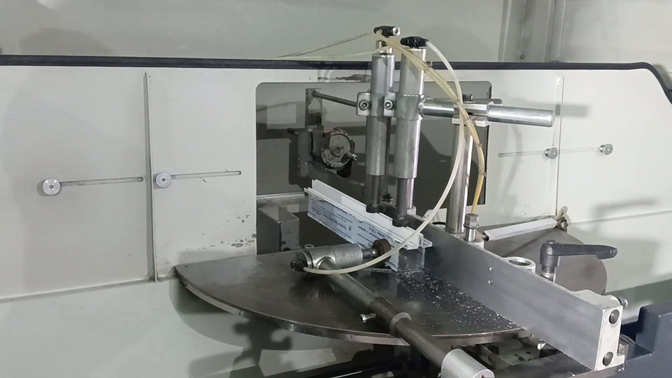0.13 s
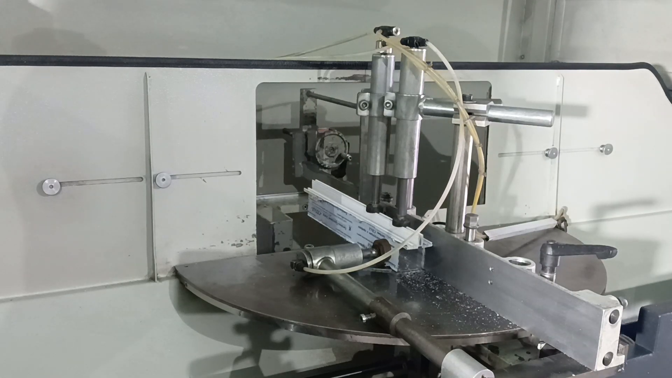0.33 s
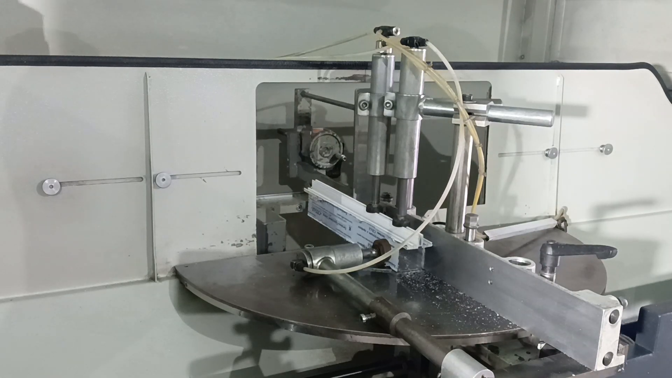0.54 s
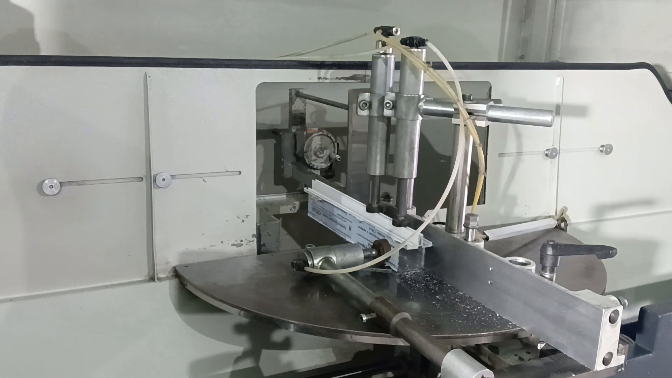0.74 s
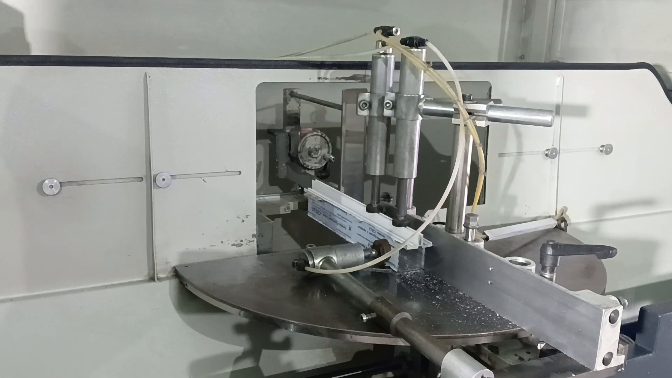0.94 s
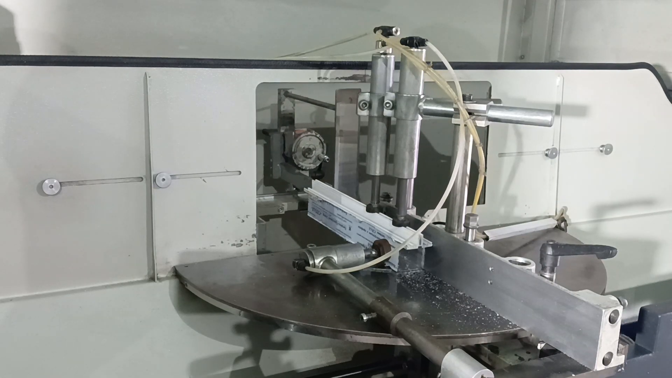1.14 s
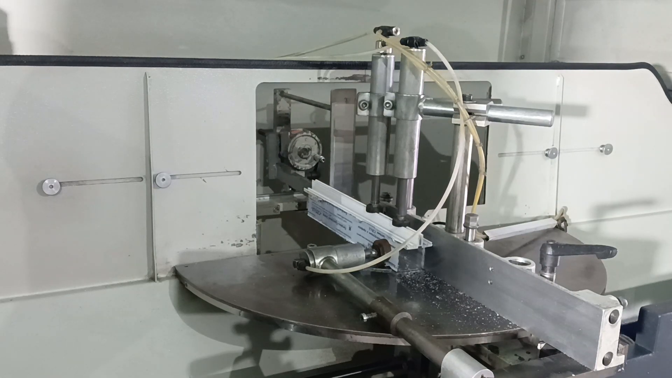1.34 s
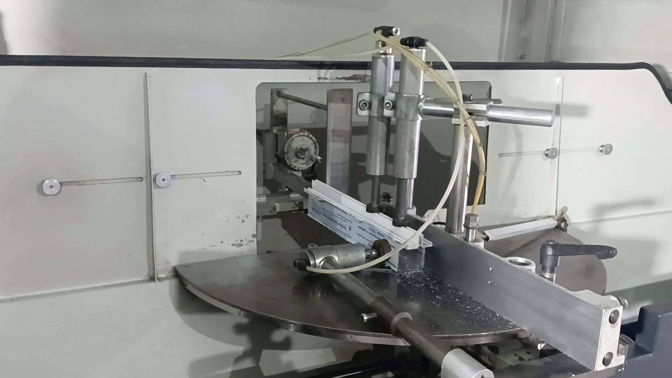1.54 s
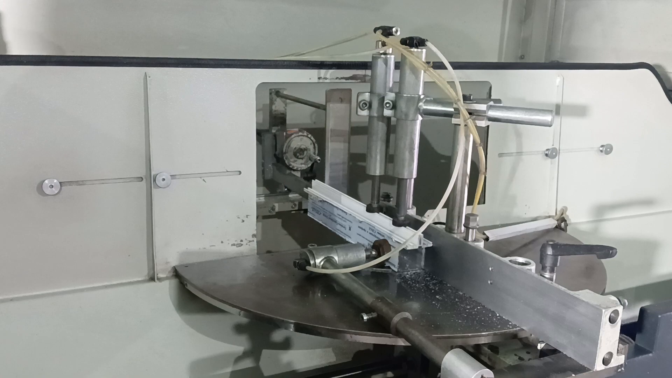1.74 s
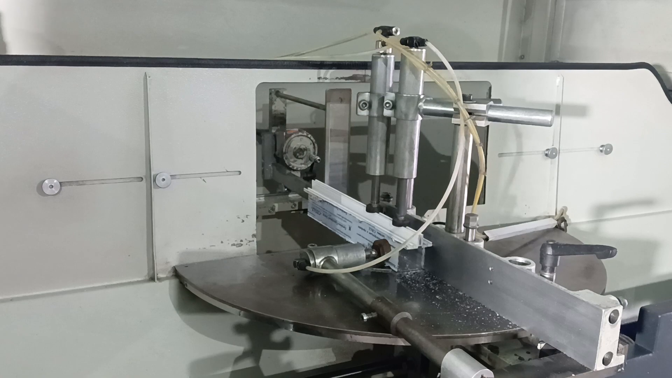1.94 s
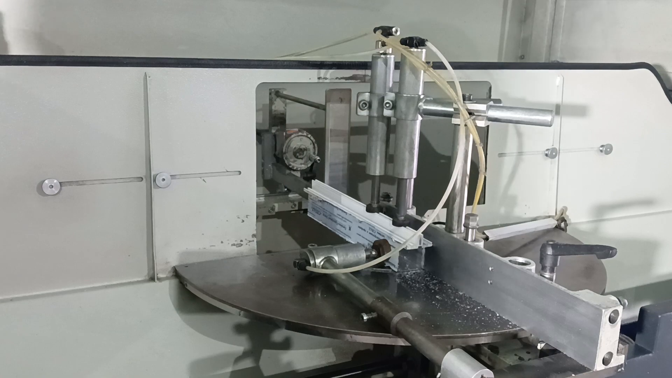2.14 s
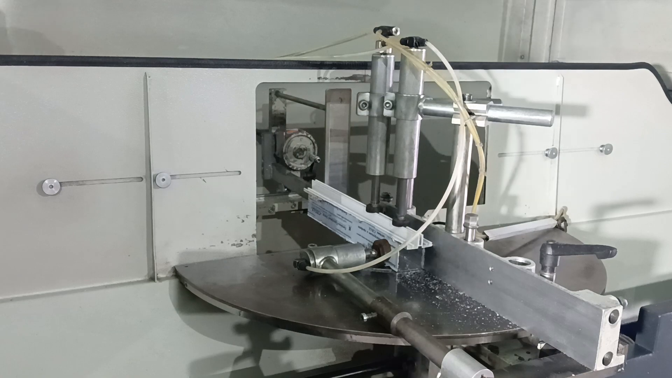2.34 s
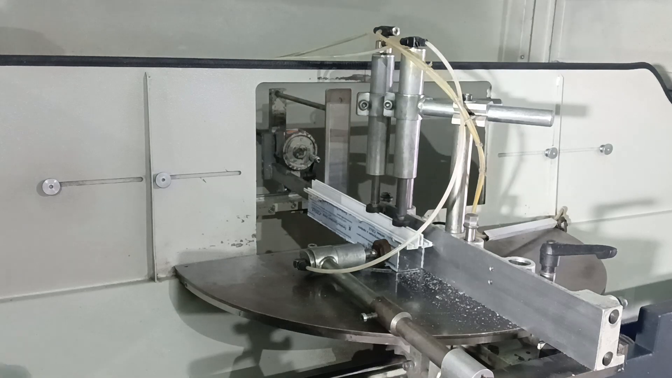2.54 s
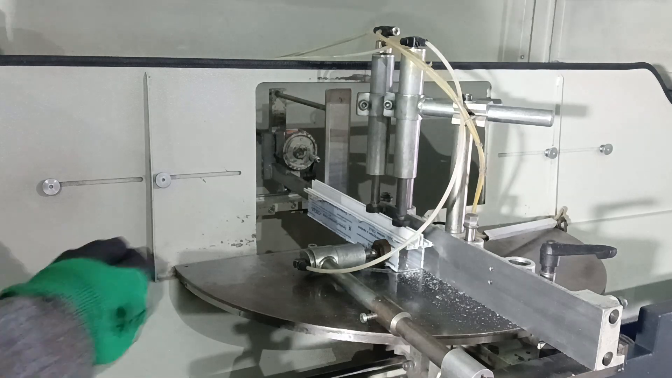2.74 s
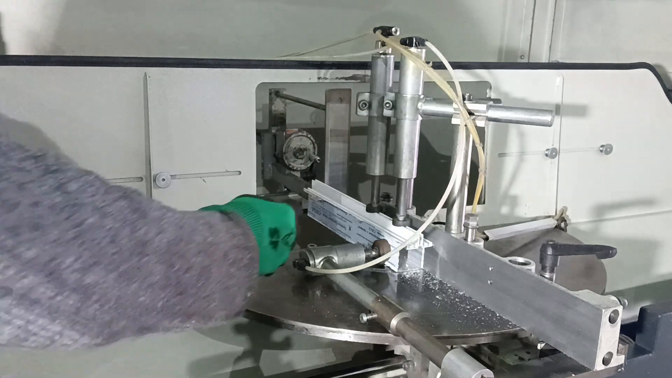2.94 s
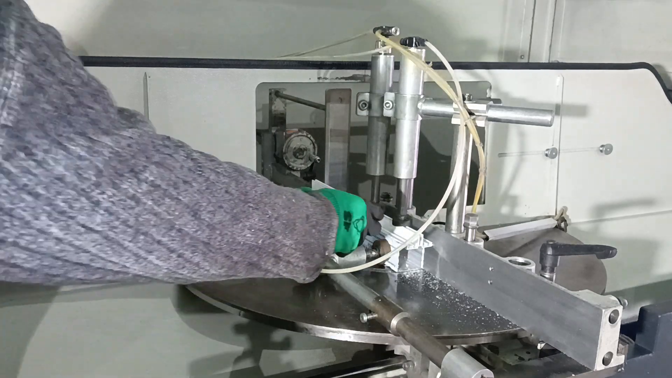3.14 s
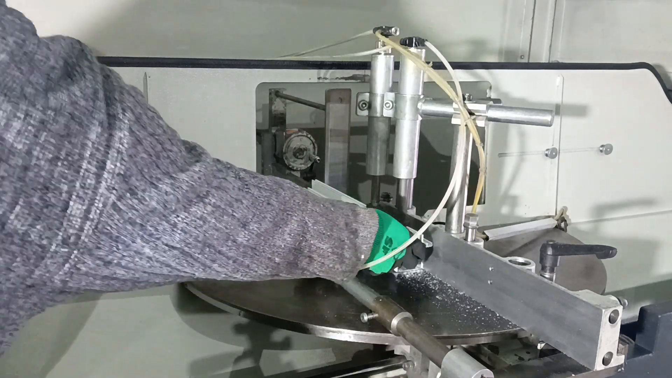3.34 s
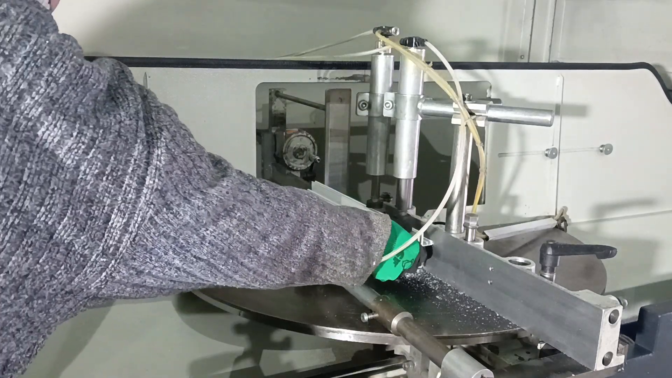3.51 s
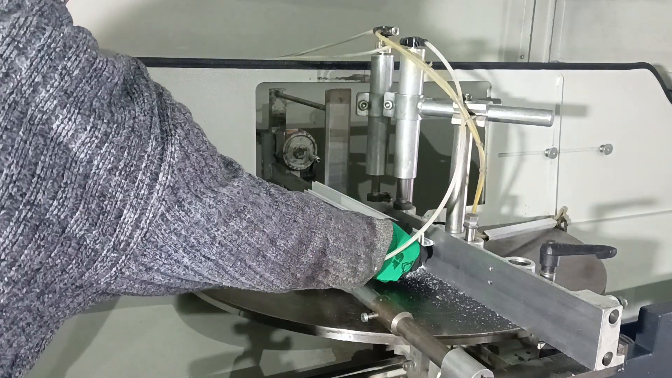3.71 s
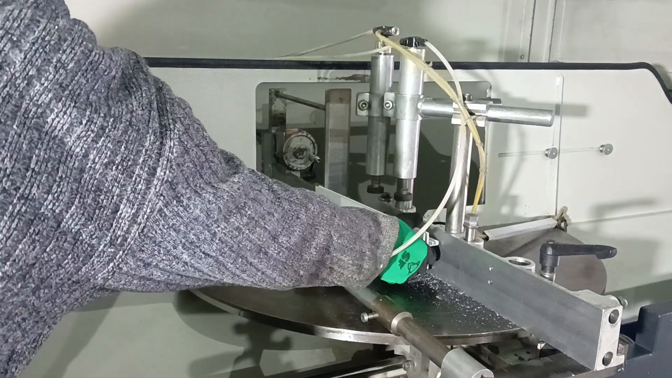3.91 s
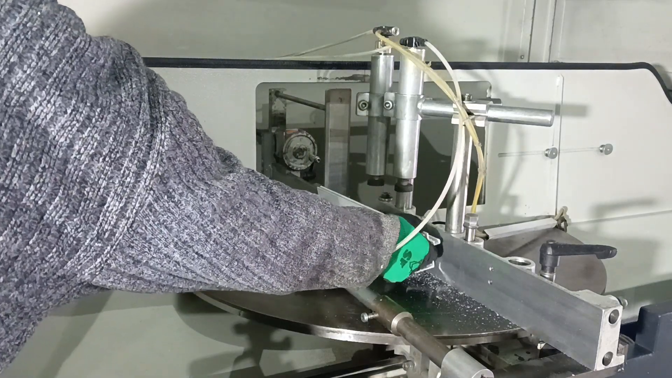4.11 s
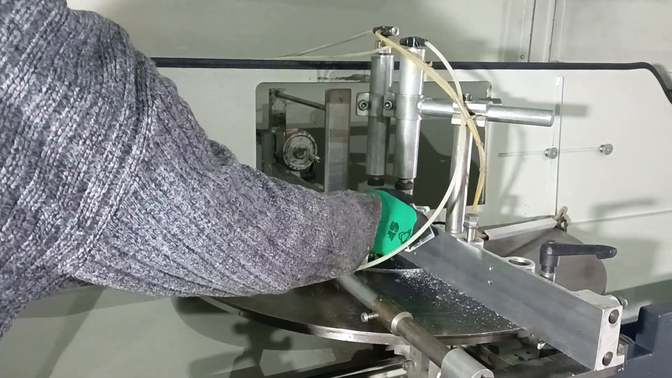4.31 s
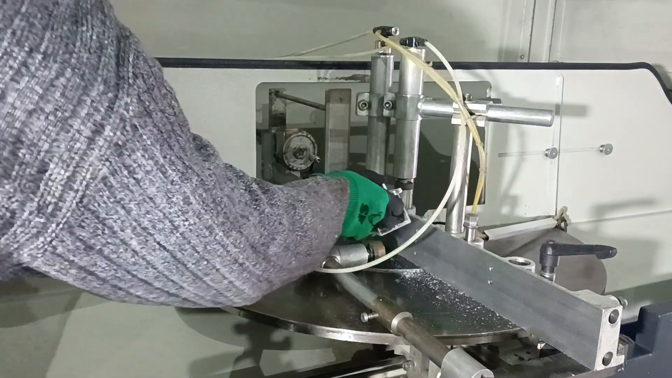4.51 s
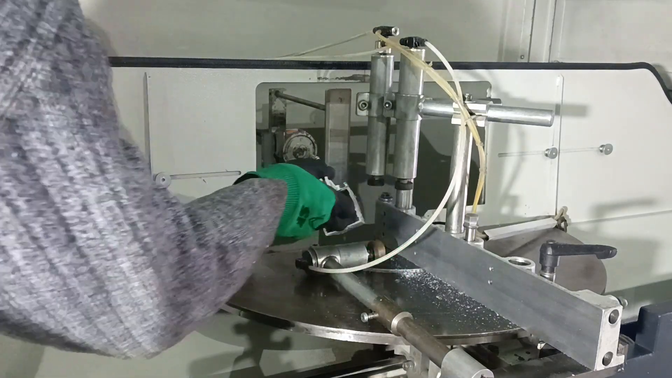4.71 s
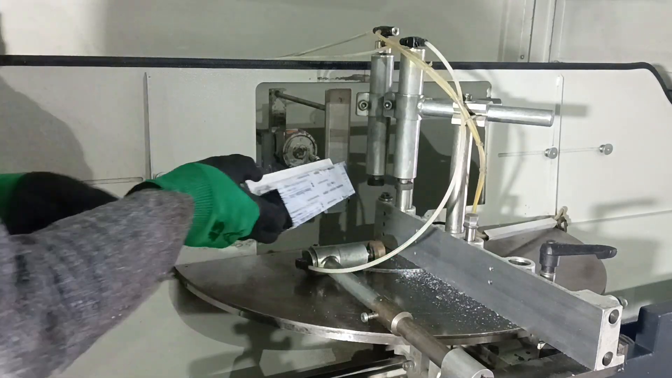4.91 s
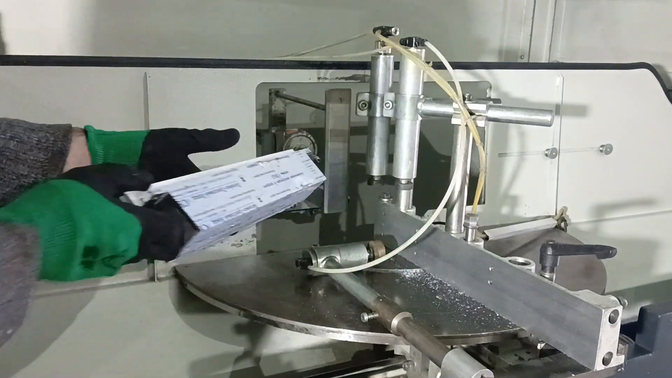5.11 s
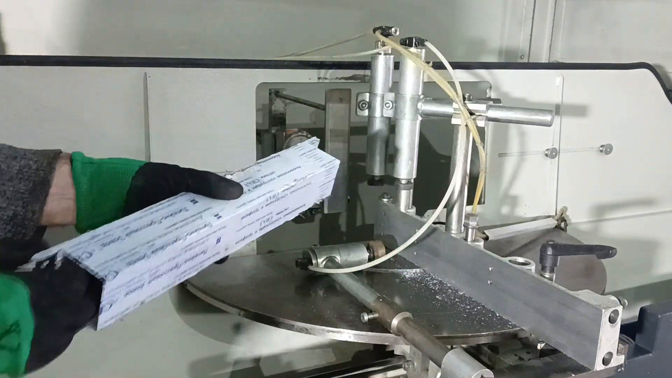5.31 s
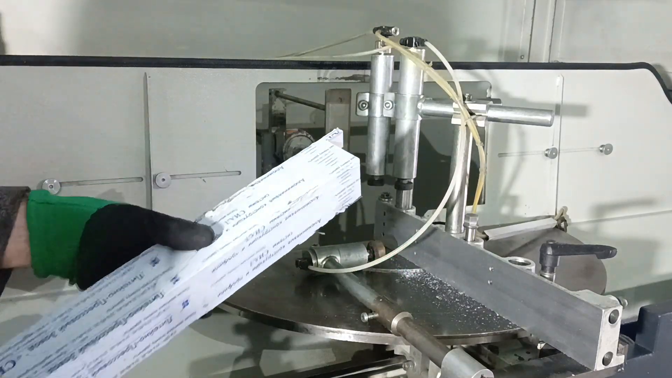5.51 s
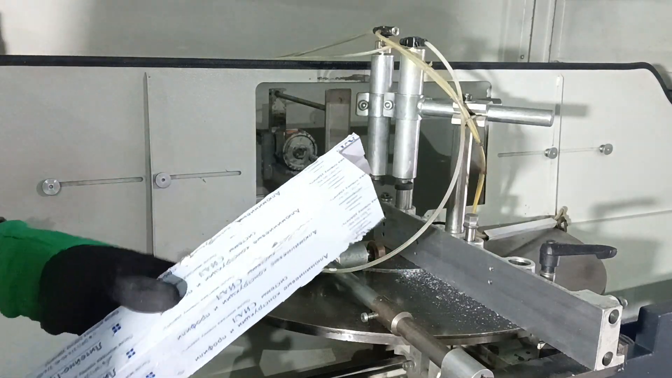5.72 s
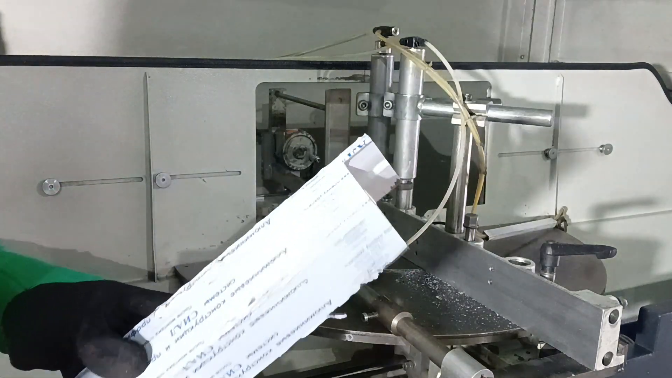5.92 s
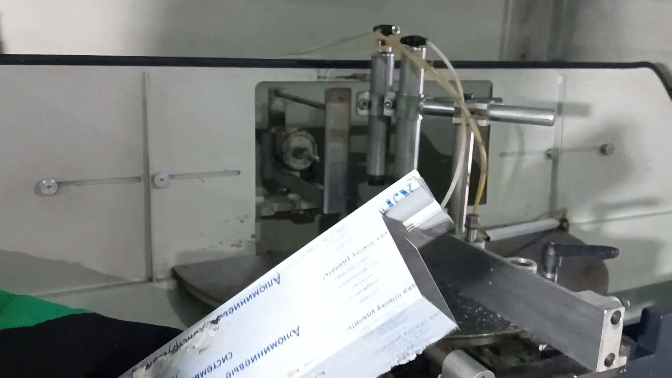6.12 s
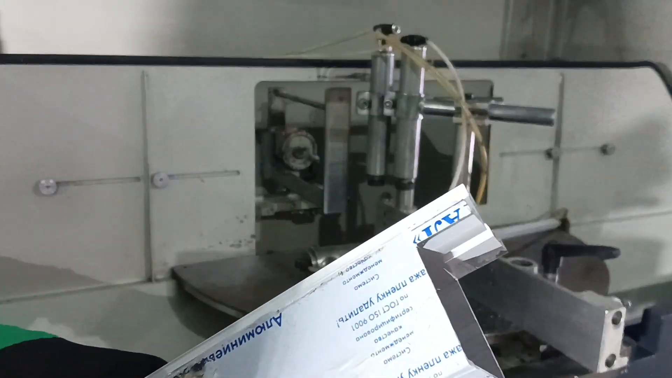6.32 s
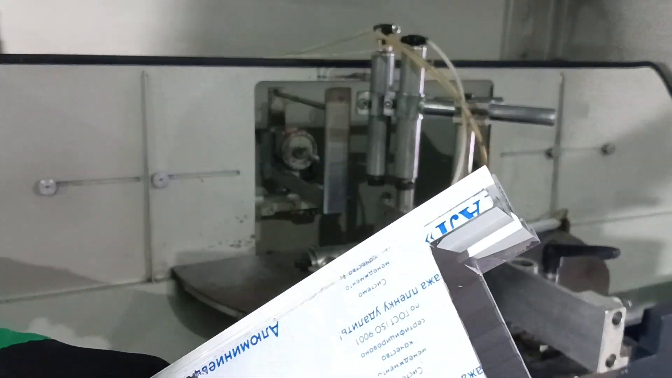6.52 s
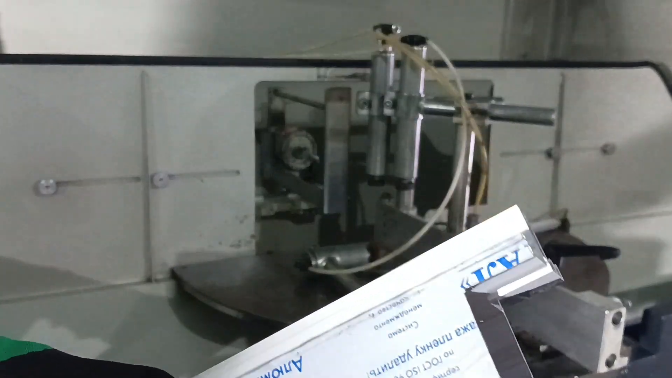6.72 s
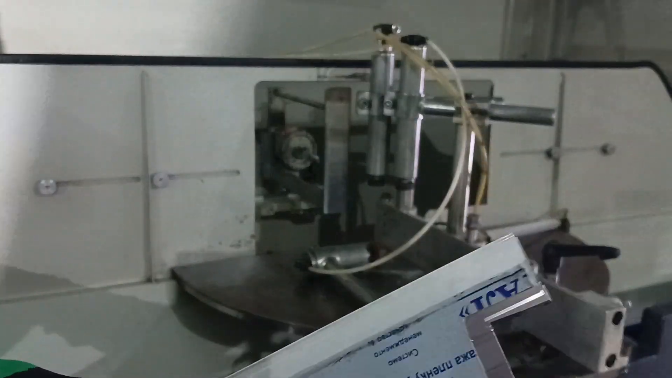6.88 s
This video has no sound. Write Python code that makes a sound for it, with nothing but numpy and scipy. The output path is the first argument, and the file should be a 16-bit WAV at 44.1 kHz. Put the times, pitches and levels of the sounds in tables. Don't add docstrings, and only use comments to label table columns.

```python
import sys
import numpy as np
from scipy import signal
from scipy.fft import rfft, irfft, next_fast_len
from scipy.io import wavfile
from scipy.ndimage import uniform_filter1d

SR = 44100
rng = np.random.default_rng(int(sys.argv[2]) if len(sys.argv) > 2 else 0)


def decibels_to_gain(level_db):
    exponent = np.asarray(level_db, float) / 20
    return 10 ** exponent


def digitize_waveform(pressure):
    field = np.atleast_2d(pressure).T
    bounded = np.clip(field, -1, 1)
    quanta = np.round(bounded * 32767).astype(np.int16)
    wavfile.write(sys.argv[1], SR, quanta)


N = 306495
T = np.arange(N) / SR

# (frequency [Hz], density [dB per Hz])
FAST_EDDIES = [(40, -99), (90, -77), (140, -71.5), (300, -62.5), (700, -61.5), (1300, -61), (1800, -57),
               (2300, -51.5), (2750, -50.5), (3300, -58), (4000, -63.5), (5000, -69.5), (7200, -72.5),
               (12500, -78)]
# (frequency [Hz], density [dB per Hz])
SLOW_EDDIES = [(40, -108), (90, -85), (140, -80), (300, -72), (700, -69.5), (1300, -66.5), (1800, -59),
               (2300, -62), (2750, -63.5), (3300, -69.5), (4000, -77), (5000, -81.5), (7200, -84.5),
               (12500, -90)]
# (time [s], level [dB])
PATH_OPENNESS = [(0, -1), (.3, -0.5), (1.0, -1.5), (1.2, 0), (2.2, -.5), (2.9, 0), (3.4, -.5), (4.2, 0.5),
                 (4.4, 0), (4.7, -1), (5.0, .5), (5.92, 1), (6.05, 1.2), (6.7, 1.1), (6.8, 6), (6.86, 4),
                 (6.95, 5)]
# (frequency [Hz], width [Hz], level [dB])
GUARD_MODES = [(50, 12, 4), (105, 20, 4), (146, 18, 8), (187, 20, 5), (212, 16, -5), (250, 36, 3),
               (290, 24, -6), (313, 16, 7), (333, 18, -2), (356, 24, 2), (384, 18, -3), (400, 14, 3),
               (424, 32, -8), (468, 24, 3), (494, 30, 7), (540, 160, 2), (597, 36, 5), (700, 26, -3),
               (770, 90, -2.5), (852, 30, 4.5), (985, 36, 2), (1075, 30, -2), (1480, 30, 2), (2225, 50, 2),
               (2670, 40, 2), (2765, 40, 2), (2830, 60, -1.5), (3150, 400, .5)]
# (frequency [Hz], width [Hz], level [dB])
PORT_MODES = [(9023, 2030, 15), (11000, 1400, 3), (15900, 2800, 3.5)]
# (time [s], half length [s], peak level [dB])
TONE_SWELLS = [(.85, .12, -33.5), (1.2, .04, -40), (1.29, .045, -39), (1.4, .04, -46), (1.59, .05, -42),
               (1.73, .08, -36.5), (1.99, .03, -42), (2.21, .13, -41), (2.41, .03, -47), (2.63, .035, -40),
               (2.81, .06, -42), (2.99, .035, -40), (3.08, .04, -47), (3.24, .11, -42), (3.43, .03, -47),
               (3.53, .05, -41), (3.7, .1, -46), (3.87, .06, -38.5), (4.12, .08, -42), (4.33, .06, -47),
               (4.68, .18, -49), (4.97, .05, -47), (5.16, .11, -38), (5.43, .15, -43.5), (5.68, .06, -47),
               (5.9, .08, -46.5), (6.07, .04, -44.5), (6.45, .16, -41.5), (6.7, .05, -45),
               (6.89, .09, -38.5)]
# (time [s], half length [s], peak level [dB])
OCTAVE_SWELLS = [(0.39, .08, -48), (0.86, .032, -42), (1.01, .06, -43), (2.02, .025, -44), (2.6, .035, -45),
                 (3.23, .022, -45), (3.37, .032, -44), (3.78, .028, -45), (3.98, .026, -43),
                 (4.2, 0.083, -41), (4.39, .04, -41), (4.74, .055, -40), (4.92, .05, -43),
                 (5.07, .028, -43), (5.15, .028, -43), (5.56, .04, -49), (5.7, .03, -48), (6.1, .04, -46),
                 (6.32, .06, -48)]
# (frequency [Hz], level [dB])
JET_COLOUR = [(1500, -20), (4000, -8), (7000, 2), (10000, -6), (12000, 2.5), (15500, -3)]
# (time [s], peak level [dB], frequency [Hz], t60 [s])
KNOCKS = [
    (2.912, -23.5, 175, .13),
    (2.949, -26, 178, .17),
    (2.995, -32, 230, .14),
    (3.024, -30, 150, .18),
    (3.065, -34, 188, .12),
    (3.235, -41, 165, .07),
    (3.258, -43, 95, .13),
    (3.285, -43, 140, .09),
    (4.28, -46, 105, .15),
]
# (time [s], low edge [kHz], high edge [kHz])
SPREAD_BANDS = [(.044, 12.4, 14.5), (.772, 13.1, 15.2), (1.373, 6.3, 8.3), (2.778, 12.4, 13.8),
                (3.181, 10.3, 11.7), (3.503, 13.1, 14.4), (3.791, 5.7, 8.3), (3.924, 7.6, 9),
                (4.624, 6.4, 9), (4.624, 13.8, 15.2), (5.152, 11, 13.8), (5.152, 14.5, 15.8),
                (5.222, 9.7, 11.7), (5.222, 14.5, 15.8), (5.802, 11.8, 13.7), (6.098, 5.8, 6.8),
                (6.38, 7.6, 9), (6.38, 9.7, 11.7), (6.528, 6.9, 8.3)]


def teeth(t):
    full_hz, cut_s, let_go_s = 5459.9, .873, .2
    sag_hz_per_s, ease_hz_per_s2 = 270.2, 3.71
    coasting_s = let_go_s * np.logaddexp(0, (t - cut_s) / let_go_s)
    linger_hz = 17 * np.exp(-((t - 1.22) / .13) ** 2)
    return full_hz - sag_hz_per_s * coasting_s + ease_hz_per_s2 * coasting_s ** 2 + linger_hz


def eddies(patchy_db=.7, gust_db=.3, fizz_hz=4500, rumble_hz=900):
    hz, t, noise = signal.stft(rng.standard_normal(N), SR, nperseg=1024, noverlap=768)
    row_hz = hz[:, None]
    fast_hz, slow_hz = 5450, 4170
    slowed = (fast_hz - teeth(t)) / (fast_hz - slow_hz)
    db = read(FAST_EDDIES, hz)[:, None] * (1 - slowed) + read(SLOW_EDDIES, hz)[:, None] * slowed

    roar_db = np.interp(t, *np.transpose(PATH_OPENNESS))
    rumble_db = -0.45 + 0.9 * drift(len(t), size=40)
    fizz_db = -0.34 + (0.81 - 1) * roar_db + gust_db * drift(len(t), size=7)
    db += roar_db
    db += fizz_db / (1 + (fizz_hz / (row_hz + 1)) ** 4)
    db += rumble_db / (1 + (row_hz / rumble_hz) ** 4)

    patches = uniform_filter1d(drift(noise.shape, size=6), size=30, axis=0)
    db += patchy_db * patches / patches.std()
    shaped = noise * decibels_to_gain(db) * np.sqrt(SR / 2)
    hiss = signal.istft(shaped, SR, nperseg=1024, noverlap=768)[1][:N]
    return colour(hiss, bumps(GUARD_MODES + PORT_MODES))


def swells(table):
    total = 0
    for k, (s, half_s, db) in enumerate(table):
        total = total + (-1) ** k * decibels_to_gain(db) * np.exp(-abs((T - s) / half_s) ** 3)
    return total


def whistle(waver_hz=1.5, flutter_db=1.7, echo_db=-57):
    turns = np.cumsum(teeth(T) + waver_hz * drift(N, size=1500)) / SR
    steady_db, steady_end_s, fade_s = -38, .7, .025
    steady = decibels_to_gain(steady_db) / (1 + np.exp((T - steady_end_s) / fade_s))
    out = np.zeros(N)
    for k, height in enumerate([swells(TONE_SWELLS) - steady, swells(OCTAVE_SWELLS)]):
        echo = decibels_to_gain(echo_db - 4 * k) * (drift(N, size=1200) + 1j * drift(N, size=1200))
        flutter = decibels_to_gain(flutter_db * drift(N, size=380))
        tone = ((height + echo) * np.exp(2j * np.pi * (k + 1) * turns)).imag
        out += np.sqrt(2) * flutter * tone
    return out


def jet():
    vent_s, open_s, blow_s = 2.914, .012, .055
    blow_db, drain_db_per_s = -33.5, 230
    air = colour(rng.standard_normal(N), lambda hz: read(JET_COLOUR, hz) + bumps(PORT_MODES)(hz))
    out = air / air.std() * np.clip((T - vent_s) / open_s, 0, 1) ** 2
    out *= decibels_to_gain(blow_db - drain_db_per_s * np.maximum(T - vent_s - open_s - blow_s, 0))
    return out * decibels_to_gain(5.0 + 1.3 * drift(N, size=150))


def knocks():
    rise_s = .006
    out = np.zeros(N)
    for s, db, hz, t60 in KNOCKS:
        age = np.maximum(T - s, 0)
        envelope = decibels_to_gain(db - 60 * age / t60) * (1 - np.exp(-age / rise_s))
        out += envelope * np.sin(2 * np.pi * hz * age)
    return out


def shop(x, ripple_db=1.4):
    hz_grid = np.arange(SR // 2 + 1)
    above_low_modes = np.clip(hz_grid / 1200 - .5, 0, 1)
    ripple = ripple_db * drift(len(hz_grid), size=14) * above_low_modes
    return colour(x, lambda hz: np.interp(hz, hz_grid, ripple) - 10 * np.log10(1 + (34 / (hz + 1)) ** 6))


def read(points, hz):
    f, value = np.transpose(points)
    return np.interp(np.log(hz + 1), np.log(f + 1), value)


def colour(x, db_of_hz):
    size = next_fast_len(len(x))
    gain = decibels_to_gain(db_of_hz(np.fft.rfftfreq(size, 1 / SR)))
    return irfft(rfft(x, size) * gain, size)[:len(x)]


def bumps(table):
    return lambda hz: sum(db / (1 + (2 * (hz - f) / width) ** 2) for f, width, db in table)


def drift(shape, size):
    x = uniform_filter1d(uniform_filter1d(rng.standard_normal(shape), size), size)
    return x / x.std()


def scene():
    mono = shop(eddies() + jet() + knocks()) + whistle()
    return np.tile(mono, (2, 1))


def band_limit(x):
    return signal.sosfilt(signal.butter(12, 17080, fs=SR, output="sos"), x)


def record(dry):
    side = np.zeros(N)
    window = np.hanning(2048) ** 2
    half = len(window) // 2
    khz = np.fft.rfftfreq(len(window), 1000 / SR)
    spread_db = -1
    for s, low, high in SPREAD_BANDS:
        frame = slice(round(s * SR) - half, round(s * SR) + half)
        shuffled = abs(rfft(dry[0, frame])) * np.exp(2j * np.pi * rng.random(len(khz)))
        side[frame] += decibels_to_gain(spread_db) * window * irfft(shuffled * (khz > low) * (khz < high))
    edge_hz = 15760
    band = signal.firwin(1023, edge_hz, window=("kaiser", 10), fs=SR)
    limited = signal.oaconvolve(dry, band[None], "same")
    return band_limit(limited + np.array([side, -side]))


dry = scene()
out = record(dry)
digitize_waveform(out)
```